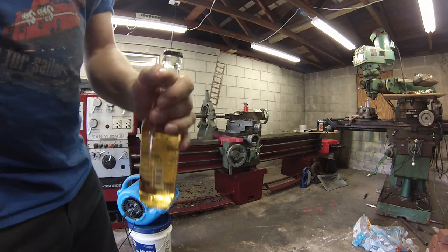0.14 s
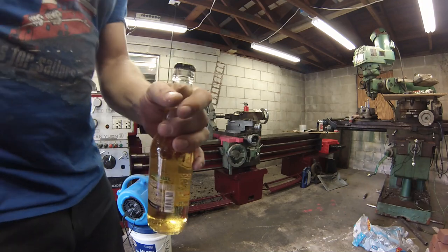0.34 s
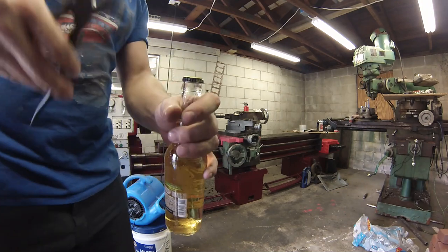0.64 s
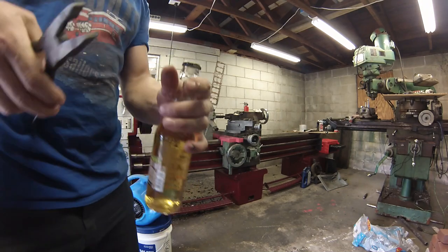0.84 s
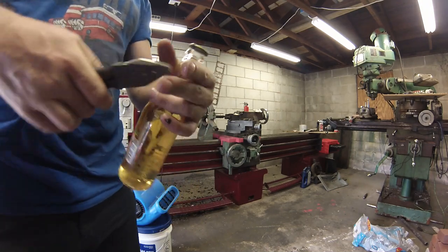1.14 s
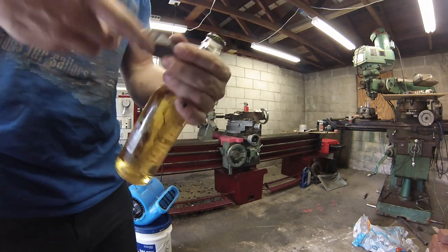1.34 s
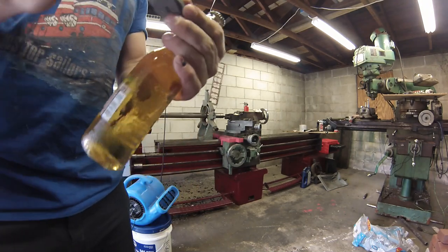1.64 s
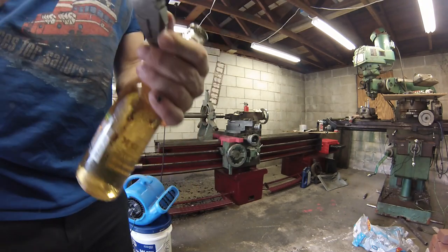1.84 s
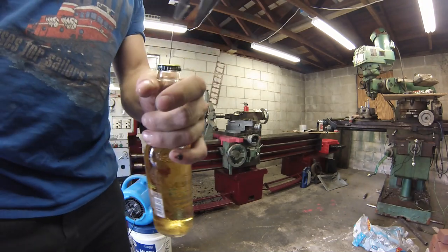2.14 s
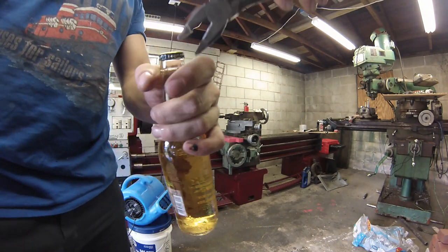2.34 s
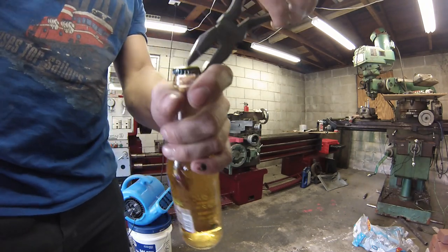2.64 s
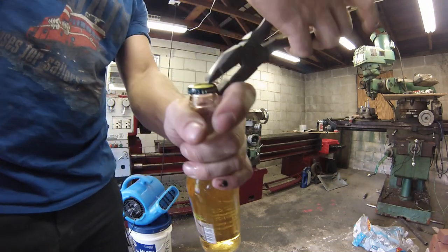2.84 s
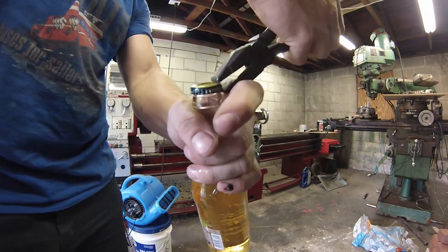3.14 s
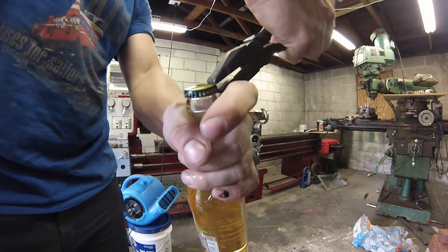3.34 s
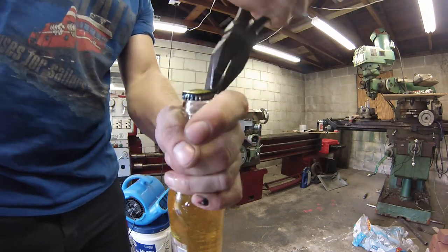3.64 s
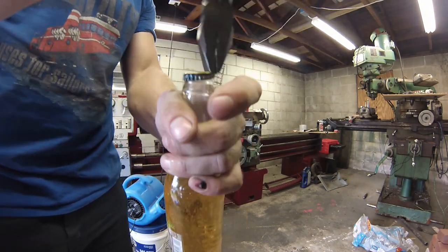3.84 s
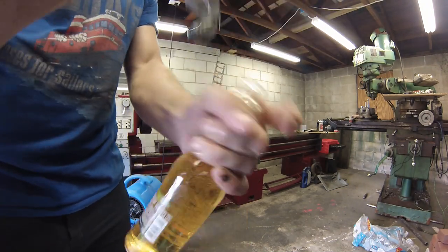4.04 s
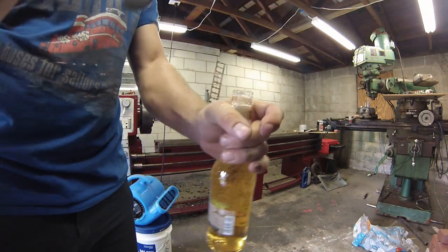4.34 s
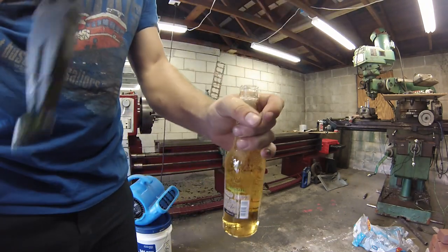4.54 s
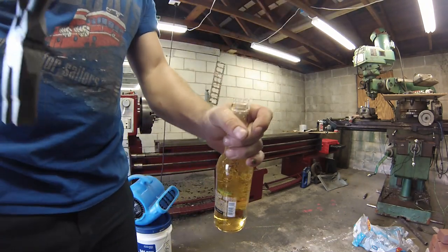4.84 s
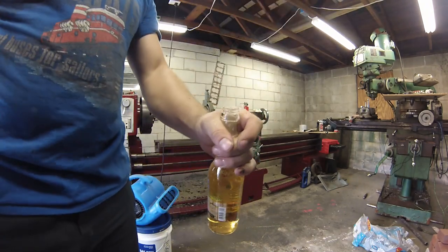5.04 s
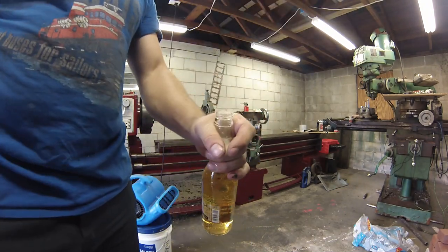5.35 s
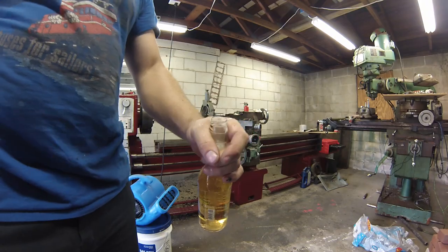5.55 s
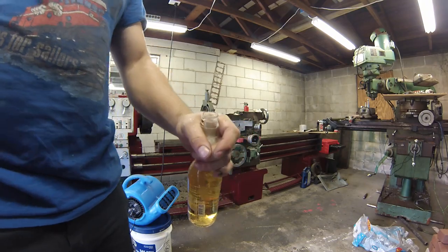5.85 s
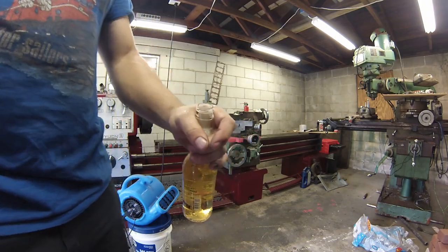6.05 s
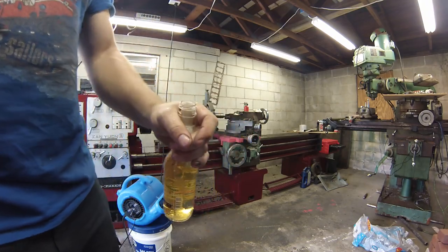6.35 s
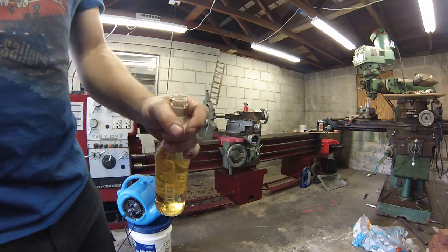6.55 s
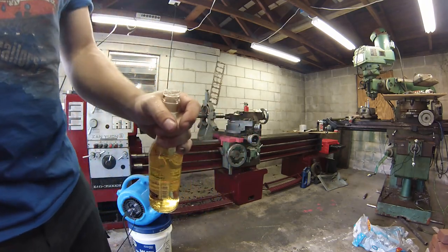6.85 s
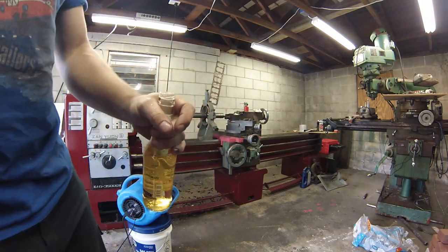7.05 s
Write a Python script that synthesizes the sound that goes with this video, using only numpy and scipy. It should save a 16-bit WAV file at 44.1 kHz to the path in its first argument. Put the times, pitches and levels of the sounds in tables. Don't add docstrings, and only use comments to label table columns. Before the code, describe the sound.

Over quiet electrical hum and a faint distant truck engine, small steel ticks lead to a bright glass clink, an abrupt puff of escaping gas and a sharp double snap of a bottle cap. After a hollow slip and soft cloth rub, the cap bounces lightly on concrete. Finally heavy pliers crash onto a metal bench, distorted and very close, tumbling and ringing with a short hard-walled room tail.

```python
import sys
import numpy as np
from scipy import signal
from scipy.fft import rfft, irfft
from scipy.io import wavfile
from scipy.ndimage import uniform_filter1d

SR = 44100
rng = np.random.default_rng(int(sys.argv[2]) if len(sys.argv) > 2 else 0)


def pcm_store(signal):
    levels = np.round(np.clip(np.atleast_2d(signal), -1, 1) * 32767)
    wavfile.write(sys.argv[1], SR, levels.astype(np.int16).T)


def linear_from_db(decibels):
    return 10 ** (np.asarray(decibels, float) / 20)


N = 317366
START_S = 0.23
DULL_TOP_HZ = 11600

# pitch_hz [Hz], level_db [dB], t60_s [s]
JAW_MODES = [(1130, -3.5, 0.031), (3043, 4.5, 0.018), (5500, 1, 0.086), (7060, -9.5, 0.056)]
# start_s [s], peak_db [dB], bright_db [dB], ring_db [dB re peak]
BOUNCE_BLOWS = [
    (6.337, -11.5, 0, -1),
    (6.3721, -18, -1, -10),
    (6.3821, -11, -2.5, 2),
    (6.403, -23.5, -6, -1.5),
    (6.429, -35, -3, -7),
]
# start_s [s], peak_db [dB], bright_db [dB], ring_db [dB re peak]
HANDLE_BLOWS = [
    (6.2654, -1, 1, 5),
    (6.277, -4, -1, -4),
    (6.301, -11.5, -0.17, -15),
]


def colour(x, points):
    hz, db = np.transpose(points)
    f = np.fft.rfftfreq(len(x), 1 / SR)
    gain_db = np.interp(np.log(f + 1), np.log(hz), db)
    return irfft(rfft(x) * linear_from_db(gain_db), len(x))


def set_rms(x, db):
    return x * linear_from_db(db) / np.sqrt(np.mean(x ** 2))


def curve(rows, quiet_db=-120):
    s, *columns = np.transpose(rows)
    t = np.arange(N) / SR
    followed = [np.interp(t, s, c) for c in columns[:-1]]
    return followed + [np.interp(t, s, columns[-1], quiet_db, quiet_db)]


def decay(t, t60):
    return np.exp(-np.log(1000) * t / np.maximum(t60, .004))


def wander(rate_hz):
    k = int(SR / rate_hz)
    steps = np.repeat(rng.standard_normal(N // k + 1), k)
    smooth = uniform_filter1d(uniform_filter1d(steps, k), k)[:N]
    return smooth / smooth.std()


def tone(hz, db):
    return np.sqrt(2) * linear_from_db(db) * np.sin(2 * np.pi * np.cumsum(hz) / SR)


def add(out, s, x):
    i = int(s * SR)
    out[i:i + len(x)] += x[:N - i]


def ring(modes, seconds, scatter_db, flutter_db):
    hz, db, t60 = np.transpose(modes)[:, :, None]
    t = np.arange(int(seconds * SR)) / SR
    detune, sign, scatter = rng.standard_normal((3, len(modes), 1))
    waves = np.sin(2 * np.pi * hz * (1 + 0.0021 * detune) * t) * np.sign(sign)
    hold = SR // 150
    steps = rng.standard_normal((len(modes), len(t) // hold + 1))
    flutter = uniform_filter1d(np.repeat(steps, hold, axis=1), hold, axis=1)[:, :len(t)]
    gains = linear_from_db(db + scatter_db * scatter + flutter_db * flutter)
    return (gains * waves * decay(t, t60)).sum(0) / np.sqrt(np.sum(linear_from_db(db) ** 2))


def blows(events, crack, modes, edges_hz, scatter_db=3.0, flutter_db=5.0, top_hz=14500):
    thud_db, treble_db, t60_s = crack
    out, t = np.zeros(N), np.arange(int(.35 * SR)) / SR
    bands = [signal.butter(3, edge, "bandpass", fs=SR, output="sos")
             for edge in (edges_hz[:2], edges_hz[2:], (edges_hz[3], top_hz))]
    fade_out = np.cos(t / t[-1] * np.pi / 2)
    for s, peak_db, bright_db, ring_db in events:
        *noises, chatter = rng.standard_normal((4, len(t)))
        grit = linear_from_db(4.43 * chatter)
        gains_db = (thud_db - bright_db, 0, treble_db + bright_db)
        burst = 0
        for band, gain_db, slow, noise in zip(bands, gains_db, (1.1, 1, .8), noises):
            part = signal.sosfilt(band, noise * grit * decay(t, t60_s * slow))
            burst = burst + linear_from_db(gain_db) * part / np.abs(part).max()
        body = ring(modes, .35, scatter_db, flutter_db) * fade_out
        add(out, s, linear_from_db(peak_db) * (0.64 * burst + linear_from_db(ring_db) * body))
    return out


def room(x):
    # band_hz [Hz], t60_s [s]
    wall_decay = [
        (200, 0.45),
        (700, 0.3),
        (2000, .36),
        (5000, 0.29),
        (11000, 0.27),
    ]
    t, tail = np.arange(int(.8 * SR)) / SR, 0
    for hz, t60 in wall_decay:
        shape = [(hz / 3, -30), (hz / 1.6, 0), (hz * 1.6, 0), (hz * 3, -30)]
        tail = tail + colour(rng.standard_normal(len(t)), shape) * decay(t, t60)
    tail = signal.sosfilt(signal.butter(4, 12500, fs=SR, output="sos"), tail)
    tail *= np.clip((t - .003) / 0.0063, 0, 1)
    return signal.fftconvolve(x, tail / np.sqrt(np.sum(tail ** 2)))[:N]


def shop_air():
    # pitch_hz [Hz], level_db [dB per Hz]
    air_colour = [(24, -5.5), (55, 1.5), (75, 0), (98, -12), (200, -20), (560, -28), (1680, -35.5),
                  (12100, -47.5)]
    air = set_rms(colour(rng.standard_normal(N), air_colour), -42)
    air = signal.sosfilt(signal.ellip(8, .2, 60, 12700, fs=SR, output="sos"), air)
    low = signal.sosfiltfilt(signal.butter(2, 100, fs=SR, output="sos"), air)
    t = np.arange(N) / SR
    shake_s, shake_db, shake_t60_s = 6.08, 8, 2.5
    shake = (t > shake_s) * linear_from_db(shake_db) * decay(np.abs(t - shake_s), shake_t60_s)
    rumble = set_rms(low, -47) * (1 + shake) * np.clip((t - START_S) / 0.21, 0, 1)
    return air - low, rumble


def lamp_hum():
    hum_hz, width_hz, hum_db = 120, 1.5, -50.5
    return tone(hum_hz + width_hz * wander(12) / 2, hum_db + 4.7 * wander(13.0))


def lamp_ballast():
    # pitch_hz [Hz], level_db [dB per Hz]
    ballast_colour = [(70, -59.5), (100, -14), (122, -3), (150, -17.5), (220, -77)]
    return set_rms(colour(rng.standard_normal(N), ballast_colour), -56.5)


def jaw_ticks():
    # start_s [s], peak_db [dB], bright_db [dB]
    tick_blows = [(0.371, -40.5, 2), (0.6173, -31, -4.5), (2.6999, -44.5, -15.5), (2.851, -49, -6),
                  (3.0635, -38, 17.5), (3.0883, -42, 6), (3.6739, -36.5, -10.5), (3.6988, -48, -16),
                  (3.732, -47, 4), (3.744, -43.5, 8), (3.7525, -25.5, 8), (3.7698, -35.5, 1.5),
                  (3.8809, -36.5, 12.5), (4.206, -45.5, -11.5)]
    ticks = [(*row, -37) for row in tick_blows]
    return blows(ticks, (-5.5, -5.5, 0.021), JAW_MODES, (300, 1500, 2000, 6000))


def jaw_clicks():
    # start_s [s], peak_db [dB], bright_db [dB], ring_db [dB re peak]
    click_blows = [
        (1.2214, -19, 3.5, -13.5),
        (1.2415, -29.5, -4, -25),
        (1.252, -40, 4, -27),
    ]
    return blows(click_blows, (-11.5, -10.5, 0.016), JAW_MODES, (820, 1440, 2380, 5840), top_hz=DULL_TOP_HZ)


def finger_rustles():
    # start_s [s], peak_db [dB], bright_db [dB]
    rustle_blows = [
        (1.408, -56, 0),
        (1.498, -54, 1),
    ]
    rustles = [(*row, -40) for row in rustle_blows]
    return blows(rustles, (-20, 9, 0.15), JAW_MODES, (300, 1000, 3000, 9000))


def jaw_snap():
    # start_s [s], peak_db [dB], bright_db [dB], ring_db [dB re peak]
    snap_blow = [
        (1.7524, -18.5, 0, -3),
    ]
    # pitch_hz [Hz], level_db [dB], t60_s [s]
    shut_modes = [(2880, -7, 0.057), (3360, 5, 0.056), (4070, 2, 0.025), (5010, 6, 0.022),
                  (7000, -3, 0.048)]
    return blows(snap_blow, (-19, -5, 0.028), shut_modes, (800, 2000, 2800, 7500), top_hz=DULL_TOP_HZ)


def glass_knock():
    # start_s [s], peak_db [dB], bright_db [dB], ring_db [dB re peak]
    knock_blow = [
        (2.5026, 1.5, 0.0018, -11.5),
    ]
    # pitch_hz [Hz], level_db [dB], t60_s [s]
    glass_modes = [(460, -17, 0.08), (800, -9, 0.034), (1227, -2, 0.15), (1502, -12, .15),
                   (1707, -21, 0.33), (2568, -11, 0.45), (2880, -11, .17), (3187, -6, 0.24),
                   (3050, 3, 0.025), (4183, -3, .19), (4560, 0, 0.03), (4856, -8, 0.13), (5819, -11, 0.18),
                   (5992, -8, 0.24)]
    return blows(knock_blow, (-11.5, -11.5, 0.055), glass_modes, (250, 2000, 2500, 5200), 0, 0.76)


def far_truck():
    # start_s [s], firing_hz [Hz], third_order_db [dB]
    engine = [
        (2.9, 41.9, -67),
        (3.35, 51.17, -64),
        (3.55, 53.34, -54.5),
        (3.95, 53.64, -57),
        (4.2, 55.18, -61),
        (4.33, 57.3, -51.5),
        (4.7, 57.9, -58),
        (4.9, 59.3, -69),
        (6.2, 62.03, -72),
    ]
    hz, third_db = curve(engine)
    hz = hz * (1 + .01 * wander(9.1))
    first_db = -48.5 + .25 * (third_db - third_db.max())
    return tone(hz, first_db + 1.8 * wander(13)) + tone(3 * hz, third_db + 2.3 * wander(4.2))


def gas():
    # pitch_hz [Hz], level_db [dB]
    jet_colour = [(180, -60), (300, -18), (650, -12.5), (1260, -9.5), (2360, -5), (3020, -2), (7140, 0.5),
                  (15500, 1)]
    loudest_s, open_s, choke_s = 3.374, .037, .047
    spit = linear_from_db(2.5 * rng.standard_normal(N))
    late = np.arange(N) / SR - loudest_s
    drop_db = 20 * np.where(late < 0, np.abs(late / open_s) ** 2.6, np.abs(late / choke_s) ** 3)
    return set_rms(colour(rng.standard_normal(N) * spit, jet_colour), -11.5) * linear_from_db(-drop_db)


def cap_snaps():
    # start_s [s], peak_db [dB], bright_db [dB], ring_db [dB re peak]
    snap_blows = [
        (3.5552, -6.5, 1, -8),
        (3.5645, -11, 2.5, -6),
        (3.5874, -24, 8, -6),
    ]
    # pitch_hz [Hz], level_db [dB], t60_s [s]
    cap_modes = [(865, -3, .06), (1674, -1, 0.09), (2815, -8, 0.04), (3600, -7, 0.04), (4330, 0, 0.07),
                 (5150, 0, 0.04), (7480, -9, .04), (8390, -10, .045)]
    return blows(snap_blows, (-20, -2, 0.06), cap_modes, (600, 1500, 2500, 6000))


def cap_slips():
    # start_s [s], peak_db [dB], bright_db [dB], ring_db [dB re peak]
    slip_blows = [
        (4.0991, -22, 2, -7.5),
        (4.108, -39, -1.6, 8),
    ]
    # pitch_hz [Hz], level_db [dB], t60_s [s]
    neck_modes = [(612, 3.5, 0.027), (880, -5, 0.053), (1610, -13, 0.071), (2630, 4, 0.056),
                  (3420, 2, 0.02), (4650, -2, 0.023)]
    return blows(slip_blows, (2, -4, 0.025), neck_modes, (200, 900, 2200, 5000), 1.0, 4.5, DULL_TOP_HZ)


def jaw_pings():
    # start_s [s], pitch_hz [Hz], peak_db [dB], t60_s [s]
    tip_pings = [
        (4.2719, 2900, -42, 0.016),
        (4.2715, 6360, -51, 0.014),
        (5.884, 7040, -40.5, 0.014),
    ]
    out = np.zeros(N)
    for s, hz, db, t60 in tip_pings:
        add(out, s, linear_from_db(db) * ring([(hz, 0, t60)], .1, 0, 0))
    return out


def sleeve_rubs():
    # start_s [s], peak_db [dB], bright_db [dB]
    rub_blows = [
        (4.6843, -40.5, 7.5),
        (4.7045, -53, 8),
        (4.7287, -45, 2),
        (4.759, -54.5, -11),
    ]
    rubs = [(*row, -40) for row in rub_blows]
    return blows(rubs, (-35, 3.2, .15), JAW_MODES, (300, 1000, 3000, 6000), top_hz=DULL_TOP_HZ)


def cap_on_floor():
    # start_s [s], peak_db [dB], bright_db [dB], ring_db [dB re peak]
    face_blows = [
        (5.0634, -30, -7.5, -15),
        (5.1244, -43, -16, -7),
        (5.228, -24.5, 1.5, -9.5),
        (5.4251, -27, 1.5, -7.5),
        (5.4794, -37.5, -1, -1),
        (5.5333, -32, -1.5, 2.5),
        (5.5894, -43, -1, -9),
    ]
    # start_s [s], peak_db [dB], bright_db [dB], ring_db [dB re peak]
    rim_blows = [
        (5.0818, -36, 9, -3),
        (5.3622, -42, 8, 2),
        (5.4424, -29, -4, -3.5),
        (5.5494, -30.5, -6.5, -5),
    ]
    # pitch_hz [Hz], level_db [dB], t60_s [s]
    face_modes = [(3545, 8, 0.14), (4760, -12, 0.05), (8600, -10, 0.08), (9460, -8, 0.1)]
    # pitch_hz [Hz], level_db [dB], t60_s [s]
    rim_modes = [(2130, -14, 0.06), (3535, -6, 0.15), (4940, -9, .04), (5445, 0, .1), (9400, -8, 0.041),
                 (10730, -11, .04)]
    face = blows(face_blows, (-14.5, 1, 0.055), face_modes, (300, 1000, 2200, 6000), 1.0, 4.0, DULL_TOP_HZ)
    rim = blows(rim_blows, (-18, -0.77, 0.051), rim_modes, (300, 1000, 3500, 6000), 1.0, 4.0, 13500)
    return face + rim


def whistle():
    # start_s [s], pitch_hz [Hz], level_db [dB]
    flight = [
        (6.035, 6800, -80),
        (6.045, 7300, -69),
        (6.058, 7900, -69),
        (6.064, 8050, -80),
    ]
    return tone(*curve(flight))


def bench_blows():
    # start_s [s], peak_db [dB], bright_db [dB], ring_db [dB re peak]
    thud_blows = [
        (6.0727, -7, 8.5, -9.5),
        (6.0777, 5.5, -7.5, 4.5),
        (6.1035, 3.5, 3, 0),
        (6.145, -13.5, 12.5, -4.5),
    ]
    # pitch_hz [Hz], level_db [dB], t60_s [s]
    bench_modes = [(193.2, -20, 0.028), (251, -5.5, 0.056), (504, -3.5, 0.12), (648, 2.5, 0.062),
                   (698, -3.5, 0.02), (1137, -5.5, 0.04)]
    # pitch_hz [Hz], level_db [dB], t60_s [s]
    edge_modes = [(463, -0.5, 0.042), (1170, -4, 0.063), (1510, -1.5, 0.042)]
    slams = blows(thud_blows, (5, -18, 0.055), bench_modes, (215, 1260, 1000, 4000))
    bounces = blows(BOUNCE_BLOWS, (3.4, -31.5, 0.046), edge_modes, (253.0, 980, 1003, 2230))
    return slams + bounces


def pliers_clangs():
    # start_s [s], peak_db [dB], bright_db [dB], ring_db [dB re peak]
    clang_blows = [
        (6.086, 0, -0.5, -26),
        (6.0945, 3.5, 1, -26),
        (6.2034, 2, -9, -5.5),
        (6.221, -14.5, 0, 3),
        (6.2446, 9.5, -4.5, -13.5),
        (6.2542, 8.5, 2.5, -9.5),
    ]
    # pitch_hz [Hz], level_db [dB], t60_s [s]
    pliers_modes = [(1070, -3, .05), (1249, 5, 0.06), (2530, -2, 0.075), (3240, -4, 0.13), (4470, -12, .04)]
    return blows(clang_blows, (-9, -13.5, 0.16), pliers_modes, (273, 1040, 990, 5600))


def handles():
    # pitch_hz [Hz], level_db [dB], t60_s [s]
    handle_modes = [(1550, 1, 0.1), (2460, -12, .06), (3668, -6, 0.045), (4590, -14, .05)]
    return blows(HANDLE_BLOWS, (-11, -17.5, 0.09), handle_modes, (280, 997, 1004, 5930), 0.94, 4.8)


def tray():
    # pitch_hz [Hz], level_db [dB], t60_s [s]
    tray_rim_modes = [(3090, -11, .7), (4522, 3, .4), (8538, -5, .62)]
    # pitch_hz [Hz], level_db [dB], t60_s [s]
    tray_modes = [(743, -12, 1.1), (950, -14, 1.1), (1507, -5, 2.0), (1534, -3, 2.3), (1583, -4, 1.2),
                  (1637, -8, 1.9), (1696, -1, 1.2)]
    out = np.zeros(N)
    add(out, HANDLE_BLOWS[0][0], linear_from_db(-30) * ring(tray_rim_modes, 0.81, 0, 1.5))
    add(out, BOUNCE_BLOWS[2][0], linear_from_db(-36) * ring(tray_modes, 1., 0, 0.81))
    return out


def scene():
    near = jaw_ticks() + jaw_clicks() + jaw_snap() + glass_knock()
    near += cap_slips() + sleeve_rubs() + finger_rustles() + jaw_pings()
    cap, hiss = cap_snaps(), gas()
    bench = bench_blows() + pliers_clangs() + tray()
    floor, chime = cap_on_floor(), handles()
    send = linear_from_db(-17) * near + linear_from_db(-16.5) * cap + linear_from_db(-21.0) * hiss + linear_from_db(-6.0) * floor
    send += linear_from_db(-12.0) * bench + linear_from_db(-15.5) * chime
    direct = near + cap + hiss + linear_from_db(-2.5) * floor + bench + chime + whistle()
    wet = room(send)
    air, rumble = shop_air()
    background = rumble + lamp_hum() + far_truck() + lamp_ballast()
    background += air * linear_from_db(.8 * wander(2.3))
    return (direct + wet + background)[None]


def top_cut(x):
    return signal.sosfilt(signal.butter(12, 15760, fs=SR, output="sos"), x)


def record(dry):
    fade_in = np.clip((np.arange(N) / SR - START_S) / 0.02, 0, 1)
    x = signal.sosfilt(signal.ellip(8, .2, 60, 15350, fs=SR, output="sos"), dry * fade_in)
    return top_cut(np.clip(x, -1, 1))


dry = scene()
out = record(dry)
pcm_store(out)
```